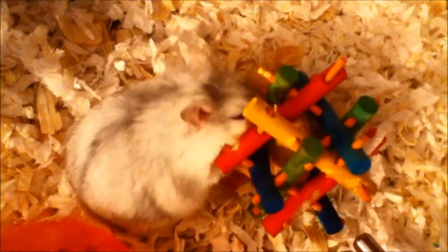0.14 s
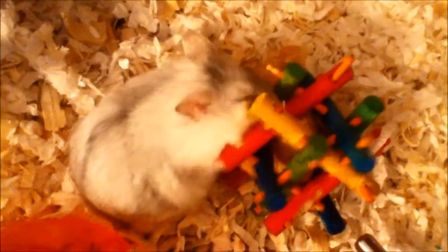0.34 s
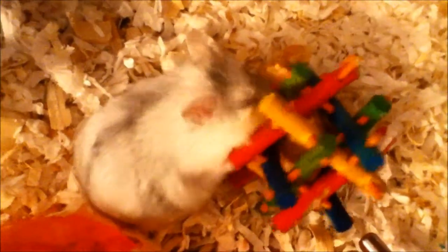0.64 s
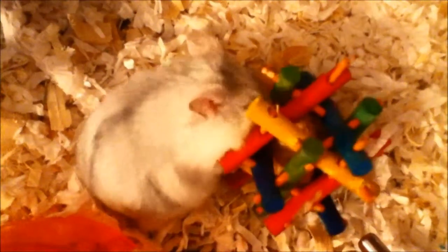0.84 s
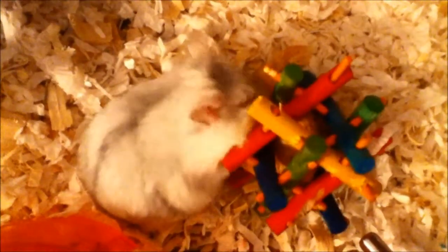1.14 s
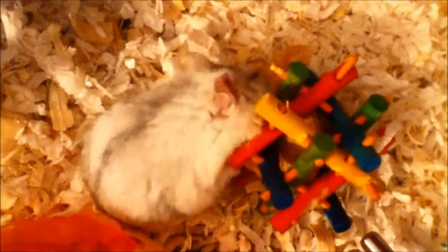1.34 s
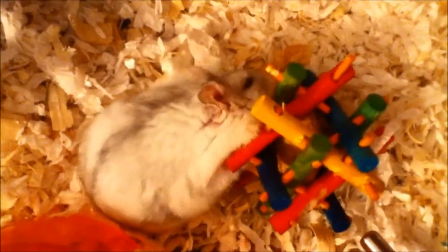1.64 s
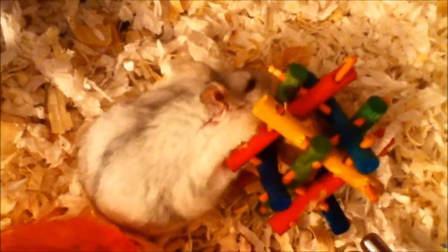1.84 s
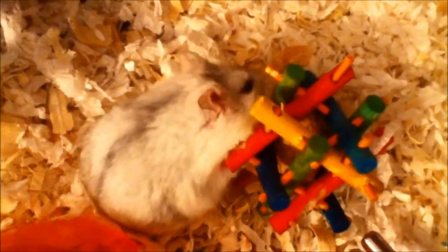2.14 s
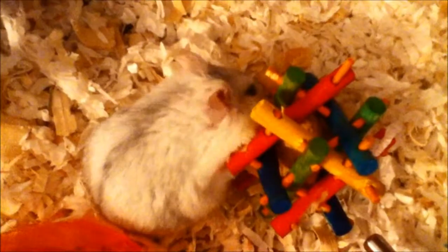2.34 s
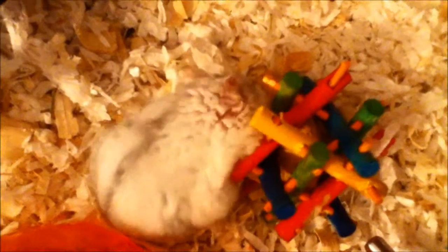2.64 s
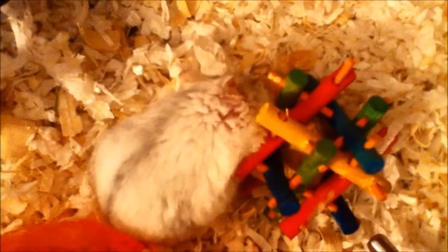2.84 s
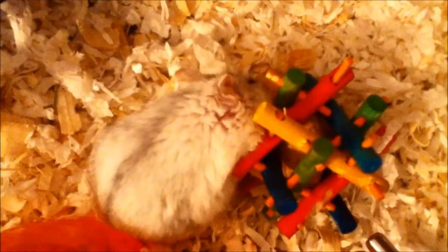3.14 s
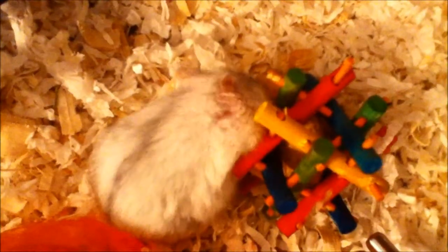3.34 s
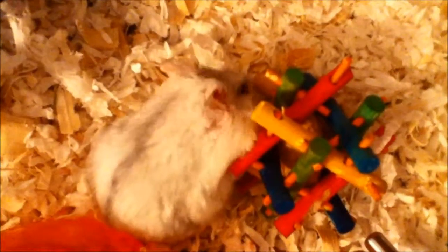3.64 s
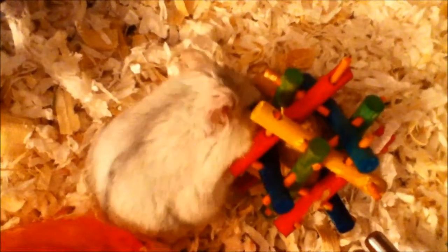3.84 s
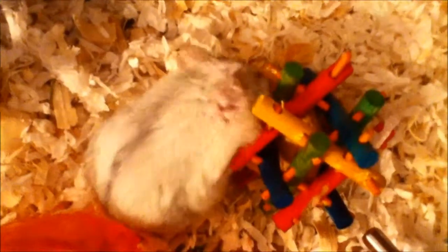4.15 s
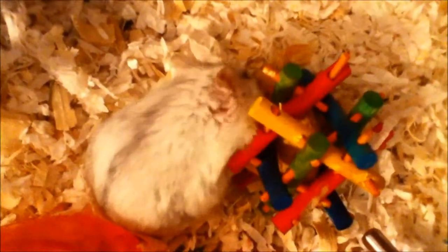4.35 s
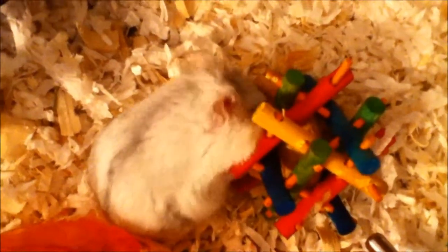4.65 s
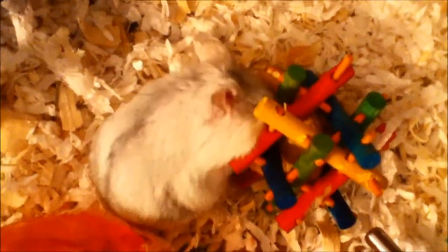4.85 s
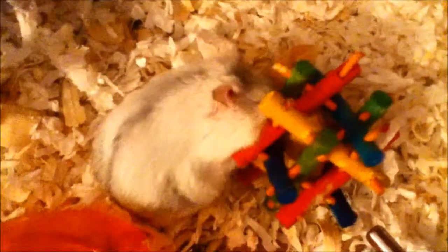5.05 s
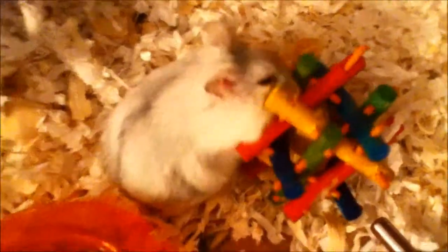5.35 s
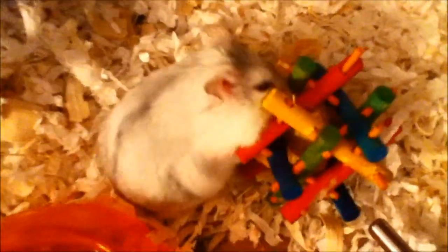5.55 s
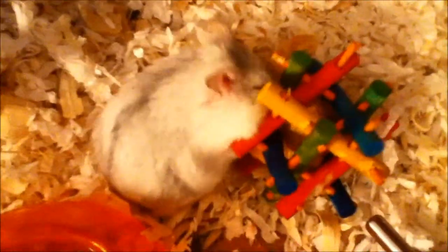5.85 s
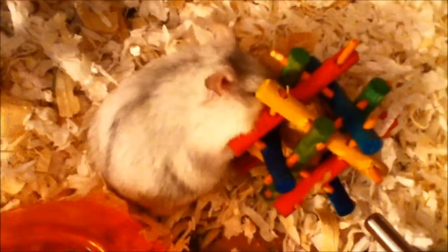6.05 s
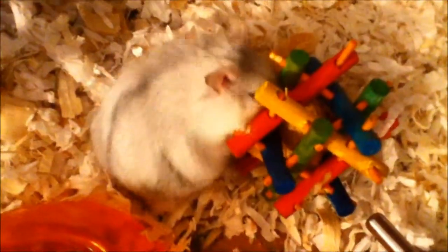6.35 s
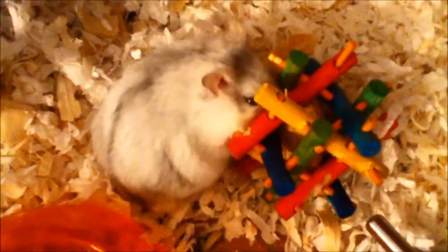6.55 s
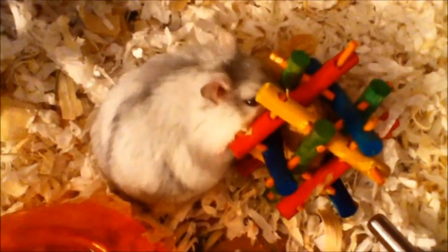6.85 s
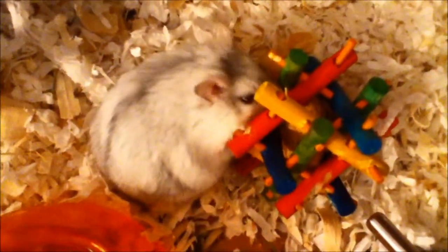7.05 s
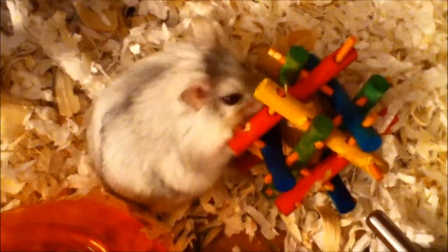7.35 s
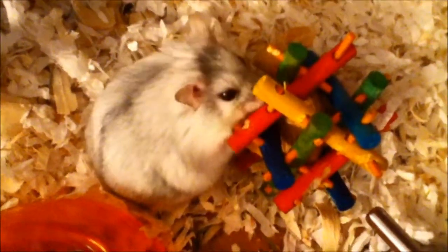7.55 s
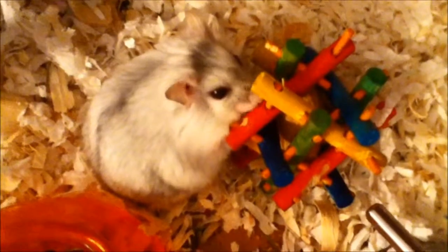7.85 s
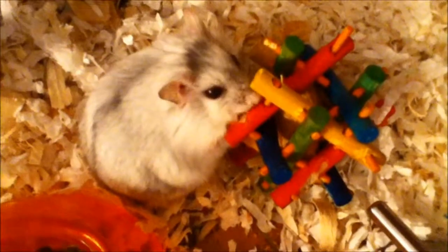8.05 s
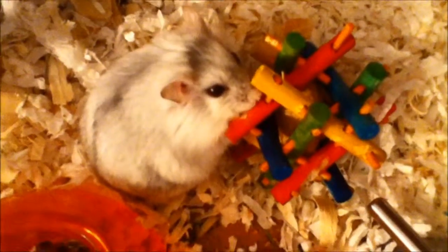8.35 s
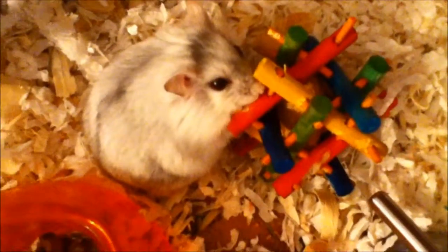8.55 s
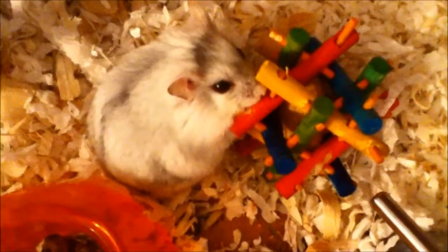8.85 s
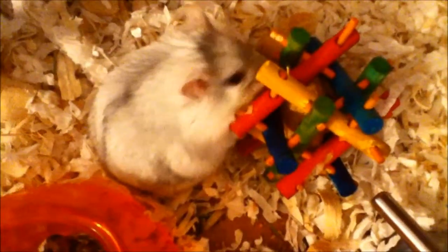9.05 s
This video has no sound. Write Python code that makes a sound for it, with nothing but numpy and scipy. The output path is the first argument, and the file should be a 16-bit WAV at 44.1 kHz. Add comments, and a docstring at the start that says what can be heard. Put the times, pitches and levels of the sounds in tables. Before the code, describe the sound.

Close to a small microphone in a quiet room, a hamster gnaws wooden sticks: two short bursts of bright, gritty scrapes with hollow knocks on the plastic cage floor. Faint shavings rustle and scattered bumps follow, then a longer, denser gnawing bout in the middle. It quiets to soft hiss and low rumble until one loud dry wood snap, followed by a momentary complete dropout.

```python
"""A hamster gnawing a wooden chew toy

Close to a small microphone, teeth tear fibres in bright scrapes: uneven random grains ring stick and splinters.
The tugged toy knocks on the hollow floor of a plastic cage, which answers with decaying modes and a crunch.
Shavings rustle faintly and scuff as clumped, filtered grains; wood snaps as a click in resonances with an echo tail.
Shaped noise gives room rumble and hiss, and the sound drops out for a moment near the end."""
import sys
import numpy as np
from scipy import signal
from scipy.io import wavfile
from scipy.ndimage import uniform_filter1d

SR = 44100
rng = np.random.default_rng(int(sys.argv[2]) if len(sys.argv) > 2 else 0)


def store_pcm(level_fs):
    """Save levels as 16-bit WAV."""
    pcm = np.round(np.clip(level_fs, -1, 1) * 32767).astype(np.int16)
    wavfile.write(sys.argv[1], SR, np.atleast_2d(pcm).T)


N = 405279  # length in samples

# All source levels are relative and hold ahead of the microphone.
# Resonance widths are those of one filter pass; two passes make the band narrower.

# Spectrum of the air noise. Each row: frequency in Hz, relative density in dB.
AIR_SPECTRUM = [(18, -45.5), (30, -21.5), (57, -8.5), (104, -6), (206, -10.5), (399, -13), (443, -17.5),
                (480, -15.5), (1030, -18.5), (1120, -18.5), (1340, -19), (2890, -21), (4070, -21),
                (14800, -24.5), (16500, -49)]
# Low rumble of the room. Each row: time in seconds, level in dB.
RUMBLE_LEVEL = [(0, -50.5), (.7, -45.5), (1.5, -49), (2.0, -47), (2.35, -49), (2.8, -46), (3.4, -50),
                (4.1, -50), (4.55, -47), (5.0, -49.5), (5.3, -42.5), (5.9, -44.5), (6.1, -49.5),
                (6.6, -47.5), (7.45, -47), (7.9, -51.5), (8.55, -48), (9.19, -51.5)]
# A faint fuzzy whistle high in the hiss. One row: frequency in Hz, width in Hz, level in dB.
WHISTLE = (15050, 150, -70)
HISS_DB = -50.5

# Short bright scrapes: tooth strokes during the gnawing bouts, faint rustles of shavings outside them.
# Each row: start in seconds, length in ms, level in dB, swell over the scrape in dB,
# brightness in dB (twice the excess of splinter force over stick force).
SHORT_SCRAPES = [(.401, 4.4, -49, -3, -14), (.420, 7, -42, -8, -18), (.433, 13, -44.5, 4, -5),
                 (.458, 31, -39.5, 9, 6), (.495, 22, -47, -3, -10), (.535, 14.5, -32, 1, 0),
                 (.568, 5, -36, -3, -4), (.593, 22, -38.5, -9, -7), (.636, 41, -35.5, 13, 4),
                 (.729, 13, -40.5, -3, -11), (.770, 28, -34, 9, -1), (.798, 29, -27, 0.5, 11),
                 (1.018, 4.3, -44, -2, -14), (1.025, 3.6, -43, -5, -3), (1.042, 9, -44, -2, -7),
                 (1.074, 15, -37, -5, -1), (1.099, 3.6, -28, -6, -2), (1.109, 7, -38, -5, -8),
                 (1.138, 9, -45, 6, -3), (1.153, 10, -41, 1, -14), (1.171, 5, -45, -5, -8),
                 (1.179, 14.6, -30.5, -3.5, -1), (1.727, 13, -43, -4.5, -18), (1.830, 11, -51, -3, -13),
                 (1.931, 49, -49, 1, -16), (2.632, 5, -50, 0, -11), (2.684, 5.4, -48, 2, -5),
                 (2.764, 4.8, -46, -2, -15), (3.114, 2, -40, -1, -6), (3.468, 2, -30, -5, -22),
                 (3.498, 21, -52, -2, -8), (4.227, 3, -48, -2, -5), (4.276, 4, -43, -2, 6),
                 (4.339, 2.8, -44.5, -4, -9), (5.005, 55, -51, 1, -8), (5.067, 6, -44, -4, -15),
                 (5.212, 13, -41.5, -10, -12), (5.254, 20, -25.5, -16, -1), (5.357, 5.4, -33, -2, 7),
                 (5.401, 9, -39, 0, 0), (5.412, 5, -29, -5, 4), (5.440, 19, -37, 6, 5),
                 (5.503, 7, -24.5, -2, 16), (5.515, 14, -38, -3, -3), (5.565, 17, -33.5, -8, -7),
                 (5.594, 14, -37.5, 2, -14), (5.611, 12, -28, -2, -13), (5.645, 18, -32, 1, -10),
                 (5.684, 42, -35.5, 3, -9), (5.735, 14, -46, -1, -16), (5.773, 20, -38, -2, -19),
                 (5.806, 29, -37.5, 1, -13), (5.848, 11.7, -32, 2.5, -14), (5.867, 6, -29, -3, -11),
                 (5.886, 10, -30, -4, 3), (5.900, 12, -44.5, -2, -8), (5.924, 5, -42, -4, -13),
                 (5.941, 12, -48, 0, -24), (5.962, 5.6, -27.5, -7, 0), (5.996, 4, -40, -2, 3),
                 (6.004, 10.5, -38, -4, -1), (6.120, 8.9, -45, -5, -14), (6.337, 13, -44.5, -6, -20),
                 (6.519, 9, -43.5, -5, -4), (7.660, 1.7, -43.5, -3, -10), (8.118, 12, -48.5, -3, -13)]
# Ticks within a scrape, single fibres letting go. Each row: start in seconds, level in dB.
FIBRE_TICKS = [(0.4208, -30), (0.4833, -15.5), (.5386, -19.5), (0.5454, -20), (.593, -27), (.6486, -20),
               (.654, -18), (.6654, -21), (.675, -13), (.733, -30), (.778, -14.5), (0.803, -14),
               (.813, -15), (.821, -12.5), (1.026, -29), (1.0483, -30), (1.0741, -29), (1.0778, -25),
               (1.0996, -20), (1.143, -25), (1.1544, -23.5), (1.1615, -27), (1.1792, -20), (3.1142, -27),
               (3.468, -22), (5.2545, -14), (5.362, -18.5), (5.412, -15), (5.4576, -13), (5.505, -12.5),
               (5.5645, -19.5), (5.5786, -28), (5.5946, -26), (5.611, -13.5), (5.6172, -13.5), (5.626, -27),
               (5.6474, -19), (5.6535, -16), (5.6585, -21.5), (5.6886, -19.5), (5.703, -22), (5.7213, -14),
               (5.7794, -27), (5.811, -23), (5.8201, -25), (5.856, -20), (5.8676, -12.5), (5.886, -17),
               (5.891, -18.5), (5.9635, -24), (5.996, -26), (6.005, -21.5), (6.5228, -29.5)]
# Bouts of gnawing, with a faint rub between the strokes. Each row: start in seconds, end in seconds, level in dB.
GNAWING_BOUTS = [(.39, 0.632, -53), (0.7, .88, -52.5), (0.984, 1.233, -53.5), (5.208, 5.63, -49.5),
                 (5.622, 6.02, -48.5)]
# Resonances of the bitten stick. Each row: frequency in Hz, width in Hz, gain in dB.
STICK_MODES = [(4205, 446, 1), (4700, 260, -8.5), (5470, 1200, -6), (6520, 610, -7), (7960, 3300, -8)]
# Resonances of thin splinters, louder in bright scrapes. Each row: frequency in Hz, width in Hz, gain in dB.
SPLINTER_MODES = [(11370, 1860, -2), (13000, 920, -2), (14500, 1700, -0.5)]
RISE_MS, FALL_MS = 1.16, 1.67  # time for a scrape to rise and to fall by 6 dB
RUB_BRIGHTNESS_DB, RUB_EDGE_S = -9.5, 0.014  # brightness as for the scrapes
TICK_BRIGHTNESS = 1.4  # factor by which a tick exaggerates the brightness of its scrape

# The toy dragged through the shavings. Each row: time of the peak in seconds, level in dB,
# time from the peak to 1/e of it in ms.
SHAVING_SCUFFS = [(.47, -44, 26), (1.725, -45.5, 20), (1.82, -50, 17), (1.955, -43.5, 26), (2.73, -52, 40),
                  (3.51, -48.5, 24), (4.28, -49.5, 13), (4.45, -49.5, 32), (5.3, -46.5, 74),
                  (6.99, -52, 44), (8.03, -50, 15), (8.12, -52.5, 15)]
# Resonances of the shavings. Each row: frequency in Hz, width in Hz, gain in dB.
SHAVING_MODES = [(311, 73, 6.5), (800, 770, -5.5), (1910, 1700, -6.5), (3500, 2200, -10.5),
                 (6240, 2800, -7.5)]

# The toy knocking on the cage floor. Each row: start in seconds, boom level in dB, hollow ring level in dB,
# clack level in dB.
FLOOR_KNOCKS = [(0.4606, -34, -38, -43.5), (0.499, -32.5, -38, -42), (0.5627, -27, -28, -35),
                (0.694, -37.0, -38.5, -54.5), (0.7542, -36.5, -39, -44), (0.7892, -19, -16, -24),
                (0.816, -24, -67, -35), (1.099, -33.5, -40.5, -45), (1.127, -39, -54, -45),
                (1.1731, -26, -39.5, -41), (1.216, -38, -48, -59), (1.718, -34, -39, -53),
                (1.81, -42, -47, -59), (1.9434, -46, -37, -47), (1.9679, -33, -39.5, -45),
                (2.5042, -38, -47, -58), (2.716, -40, -41, -52), (2.7432, -32, -29, -33),
                (2.758, -33, -32, -41), (3.4685, -28.5, -24, -31), (3.4775, -35, -34, -45),
                (4.4175, -48, -44, -48), (4.4355, -32, -31, -46), (4.450, -34, -35, -44),
                (5.1259, -32.5, -31, -44.5), (5.2557, -40.0, -34.5, -56), (5.2815, -25.5, -45.0, -44),
                (5.324, -36, -46, -42.5), (5.3516, -33, -38, -44), (5.3992, -46.5, -43.5, -57),
                (5.4513, -26, -20.5, -30), (5.4713, -19.0, -23.5, -32), (5.5446, -25, -25, -32),
                (5.5997, -35.5, -37, -54), (5.6544, -46, -43, -47.5), (5.6881, -37, -30, -47),
                (5.7858, -27.5, -27.5, -41.5), (5.7985, -23, -28.5, -48), (5.8549, -32.5, -27.5, -32),
                (5.8605, -18, -19.5, -28.5), (5.936, -33.5, -17.0, -21.5), (5.9443, -17.5, -18, -30),
                (5.9759, -25.5, -22.5, -41), (6.0319, -37.5, -43, -47), (6.1168, -39.5, -47, -57),
                (6.5125, -44.5, -56, -52), (7.021, -39, -37.5, -58), (7.6607, -40, -41.5, -44.5)]
# Lowest floor modes. Each row: nominal frequency in Hz, level in dB, time to decay by 60 dB in seconds.
BOOM_MODES = [(96, 3.5, 0.064), (133.7, 7, 0.093), (184.5, -7, 0.13)]
# Next floor modes. Each row: nominal frequency in Hz, level in dB, time to decay by 60 dB in seconds.
HOLLOW_MODES = [(331.4, 5, 0.092), (384.5, -6, 0.096), (250.3, -12.5, 0.15)]
# Broad, dense upper modes of toy and floor. Each row: frequency in Hz, width in Hz, gain in dB.
CLACK_MODES = [(580, 200, -0.5), (894, 167, -2.5), (1320, 660, -4.5), (1930, 600, -6.5),
               (2520, 1600, -12.5)]

# Dry snaps of wood. Each row: start in seconds, crack level in dB, woody body level in dB.
WOOD_SNAPS = [(3.1138, -35, -51), (3.468, -25, -48), (3.9848, -37.5, -33.5), (5.323, -50, -29),
              (7.659, -43, -48), (8.0, -4.5, -17.5), (8.655, -40, -36.5)]
# Short ring of the snapped stick. Each row: frequency in Hz, level in dB, time to decay by 60 dB in seconds.
BODY_MODES = [(782, 3, 0.017), (989, 5, 0.016), (1160, 1.5, 0.016), (1590, -9.5, 0.031)]
# Broad resonances of the crack. Each row: frequency in Hz, width in Hz, gain in dB.
CRACK_MODES = [(2010, 1050, -3), (3400, 650, -1.5), (4840, 370, -21.5), (8240, 1500, -27.5)]
# What the cage walls send back after a snap. Each row: frequency in Hz, width in Hz, gain in dB.
WALL_MODES = [(910, 610, 3.5), (2000, 1800, -1.5), (3300, 1500, 2), (5200, 2540, -8), (8240, 4500, -13.5)]

# The moment when the sound drops out. Each row: time in seconds, gain in dB.
DROPOUT_GAIN = [(8.311, -0.5), (8.313, -18), (8.325, -28), (8.372, -38), (8.38, -51.5), (8.511, -52.5),
                (8.513, -0.5)]
MIC_GAIN_DB, EDGE_HZ = -7.5, 15900  # gain and upper band limit


def gain_of(db):
    """Logarithmic level: decibels become an amplitude factor."""
    return 10 ** (np.asarray(db) / 20)


def evened(x):
    """Normalisation: scales a signal to rms 1."""
    return x / np.sqrt(np.mean(x ** 2) + 1e-20)


def add(mix, s, sound):
    """Superposition: mixes a sound in at time s."""
    part = mix[round(s * SR):][:len(sound)]
    part += sound[:len(part)]


def uneven_grain(shape, spread_db):
    """Granular excitation: white noise whose sample sizes follow a capped exponential law in dB."""
    noise = rng.standard_normal(shape)
    return noise * gain_of(spread_db * np.minimum(rng.exponential(1, N), 5))


def resonate(x, modes):
    """Forced resonance: a sum of two-pole bands of alternating sign, each applied twice for steep flanks."""
    out = np.zeros(len(x))
    for k, (hz, width, db) in enumerate(modes):
        b, a = signal.iirpeak(hz, hz / width, SR)
        once = signal.lfilter(b, a, x)
        out += (-1) ** k * gain_of(db) * signal.lfilter(b, a, once)
    return out


def shifting(x, modes, depth_db):
    """Varying modal coupling: resonance strengths wander as the teeth move along the wood."""
    steps = rng.standard_normal((len(modes), N // 600 + 2))
    at = np.arange(N) / 600
    out = np.zeros(N)
    for k, (mode, walk) in enumerate(zip(modes, steps)):
        strength = gain_of(depth_db * np.interp(at, np.arange(len(walk)), walk))
        out += (-1) ** k * strength * resonate(x, [mode])
    return out


def ring(modes, detune, rise_s):
    """Free modal decay: dying sines after a soft blow, each mode multiplied by its own detune factor."""
    t = np.arange(SR // 5) / SR
    tones = np.zeros(len(t))
    for (hz, db, t60), factor in zip(modes, detune):
        tones += gain_of(db - 60 * t / t60) * np.sin(2 * np.pi * hz * factor * t)
    return tones * (1 - np.exp(-t / rise_s))


def air():
    """Spectral shaping of noise: random short-time spectra split into a patchy rumble and a smoother hiss."""
    frames, hz = N // 256 + 5, np.fft.rfftfreq(1024, 1 / SR)
    real, imaginary, patches = rng.standard_normal((frames, 513, 3)).T
    patches = uniform_filter1d(patches, size=6, axis=0)  # along frequency
    patches = evened(uniform_filter1d(patches, size=12, axis=1))  # along time
    f, db = np.transpose(AIR_SPECTRUM)
    density_db = np.interp(np.log(hz + 1), np.log(f + 1), db)[:, None]
    low = 1 / (1 + (hz[:, None] / 450) ** 4)  # share of the rumble, half at 450 Hz
    spectra = (real + 1j * imaginary) * gain_of(density_db + (.5 + 1.9 * low) * patches)
    rumble, hiss = (evened(signal.istft(spectra * share, nperseg=1024, noverlap=768)[1][:N])
                    for share in (low, 1 - low))
    rumble_db = np.interp(np.arange(N) / SR, *np.transpose(RUMBLE_LEVEL))
    whistle = evened(resonate(rng.standard_normal(N), [WHISTLE]))
    return gain_of(rumble_db) * rumble + gain_of(HISS_DB) * hiss + gain_of(WHISTLE[2]) * whistle


def split(bright_db):
    """Power division: shares of a force for stick and splinters, whose squares sum to one."""
    return 1 / np.sqrt(1 + gain_of([[bright_db], [-bright_db]]))


def scrape_force():
    """Force envelopes on stick and splinters: each scrape rises and falls exponentially, swelling or sagging."""
    swells, lead = np.zeros((N, 2)), SR // 20
    t_ms = np.arange(-lead, 3 * lead) * 1000 / SR
    for s, length, db, swell_db, bright_db in SHORT_SCRAPES:
        edge = np.maximum(-t_ms, 0) / RISE_MS + np.maximum(t_ms - length, 0) / FALL_MS
        progress = np.clip(t_ms / max(length, .1), 0, 1)
        shape = gain_of(db + swell_db * progress) * .5 ** edge
        add(swells, s - lead / SR, (shape * split(bright_db)).T)
    t, rub = np.arange(N) / SR, np.zeros(N)
    for start, end, db in GNAWING_BOUTS:
        rub += gain_of(db) * np.clip(np.minimum(t - start, end - t) / RUB_EDGE_S, 0, 1)
    return swells.T + rub * split(RUB_BRIGHTNESS_DB)


def ticks():
    """Impulsive excitation: short bursts of force, each coloured after the latest scrape begun."""
    force = np.zeros((N, 2))
    fade = gain_of(-8.0 * np.arange(SR // 100) * 1000 / SR)  # 8 dB per ms
    bursts = rng.standard_normal((len(FIBRE_TICKS), 2, len(fade))) * fade
    bursts *= np.linalg.norm(fade) / np.linalg.norm(bursts, axis=2, keepdims=True)  # equal energy
    starts = np.array([row[0] for row in SHORT_SCRAPES]) - .003  # a tick may lead its scrape by 3 ms
    for (s, db), burst in zip(FIBRE_TICKS, bursts):
        bright_db = SHORT_SCRAPES[np.searchsorted(starts, s) - 1][-1]
        add(force, s, (gain_of(db) * burst * split(TICK_BRIGHTNESS * bright_db)).T)
    return force.T


def scrapes():
    """Stick-slip and fracture noise: dense grains of uneven size, under each scrape, drive stick and splinters."""
    swells = scrape_force()
    breaks = uneven_grain((2, N), 1.9)
    slips = gain_of(3.9 * evened(uniform_filter1d(rng.standard_normal(N), size=50)))  # tooth sticks and slips
    grain = np.array([evened(b * slips) for b in breaks])
    force = swells * grain + ticks()
    # strong scrapes ring the stick's lowest mode; faint rustles of shavings hardly do
    strong = swells[0] / (swells[0] + gain_of(-51.0))
    lowest = shifting(force[0] * strong, STICK_MODES[:1], depth_db=2.5)
    upper = shifting(force[0], STICK_MODES[1:], depth_db=3.5)
    stick = (lowest - upper) / np.std(resonate(grain[0], STICK_MODES))  # minus keeps the signs alternating
    splinters = shifting(force[1], SPLINTER_MODES, depth_db=2.5)
    splinters = splinters / np.std(resonate(grain[1], SPLINTER_MODES))
    grit = signal.lfilter(*signal.butter(2, (1500, 3700), "band", fs=SR), force[0])  # duller part
    return gain_of(2.0) * stick + gain_of(-1.5) * splinters + gain_of(-6) * grit


def scuffs():
    """Granular friction: clumped grains of dry shavings under a smooth Gaussian swell."""
    t_ms, swell = np.arange(N) * 1000 / SR, np.zeros(N)
    for s, db, half_ms in SHAVING_SCUFFS:
        swell += gain_of(db) * np.exp(-((t_ms - 1000 * s) / half_ms) ** 2)
    grain = uneven_grain(N, 6.3)
    clumps = gain_of(2.2 * evened(uniform_filter1d(rng.standard_normal(N), size=120)))
    return swell * evened(resonate(grain * clumps, SHAVING_MODES))


def knocks():
    """Impact on a plate: low floor modes ring, slightly retuned each time, under a brief crunch of dense modes."""
    out, crunch = np.zeros(N), np.zeros(N)
    chance = rng.random((len(FLOOR_KNOCKS), 6))
    t = np.arange(SR // 10) / SR
    for (s, boom_db, hollow_db, clack_db), c in zip(FLOOR_KNOCKS, chance):
        detune = 1 + 0.046 * (c - .5)  # the contact point moves
        add(out, s, gain_of(boom_db) * ring(BOOM_MODES, detune, 0.0021))
        add(out, s, gain_of(hollow_db) * ring(HOLLOW_MODES, detune[3:], 0.00044))
        fast, slow = gain_of(clack_db - 60 * t / 0.025), gain_of(clack_db - 11.0 - 60 * t / 0.14)
        add(crunch, s, fast + slow)
    grain = uneven_grain(N, 1.4)
    clack = resonate(crunch * grain, CLACK_MODES) / np.std(resonate(grain, CLACK_MODES))
    return out + clack


def snaps():
    """Impulse response: a one-sample crack in broad resonances, a diffuse wall tail and the stick's short ring."""
    click = np.eye(1, SR // 5)[0]
    crack = resonate(click, CRACK_MODES)
    t = np.arange(len(click)) / SR
    tail = evened(resonate(rng.standard_normal(len(t)), WALL_MODES))
    tail = tail * (gain_of(-19 - 60 * t / 0.031) + gain_of(-38.5 - 60 * t / 0.25))  # early and late decay
    crack = crack / abs(crack).max() + tail
    body = ring(BODY_MODES, np.ones(len(BODY_MODES)), 0.0011)
    out = np.zeros(N)
    for s, crack_db, body_db in WOOD_SNAPS:
        add(out, s, gain_of(crack_db) * crack + gain_of(body_db) * body)
    return out


def scene():
    """Linear superposition: all sources sum at one microphone."""
    return (scrapes() + knocks() + scuffs() + snaps() + air())[None]


def record(dry):
    """Band limitation: the small microphone loses the deepest bass; then the dropout and the upper limit."""
    thin = signal.lfilter(*signal.butter(2, 60, "high", fs=SR), dry)
    s, db = np.transpose(DROPOUT_GAIN)
    muted = thin * gain_of(MIC_GAIN_DB + np.interp(np.arange(N) / SR, s, db))
    lowpass = signal.firwin(511, EDGE_HZ, window=("kaiser", 9), fs=SR)
    return signal.oaconvolve(muted, lowpass[None], "same")


dry = scene()
out = record(dry)
store_pcm(out)
```